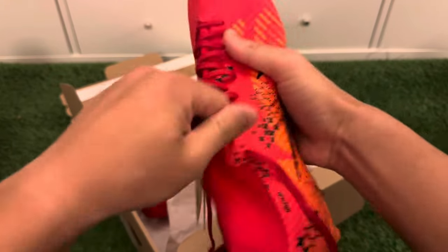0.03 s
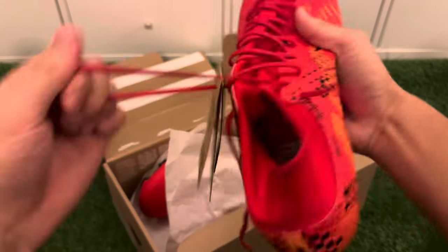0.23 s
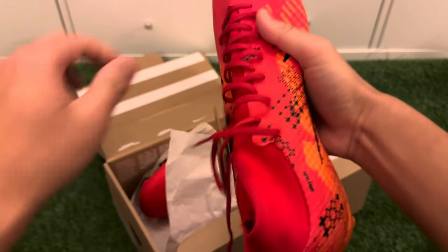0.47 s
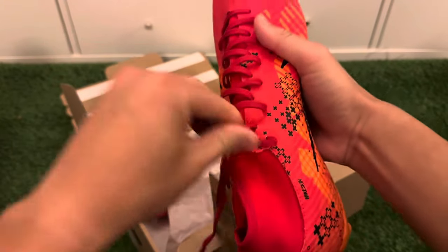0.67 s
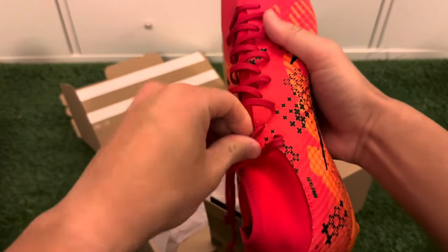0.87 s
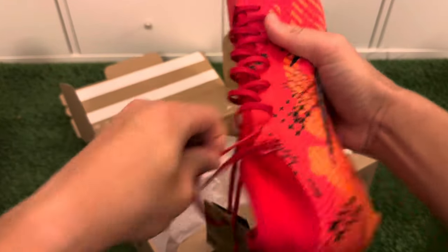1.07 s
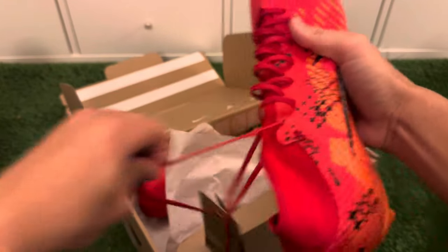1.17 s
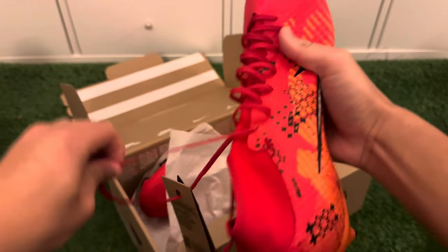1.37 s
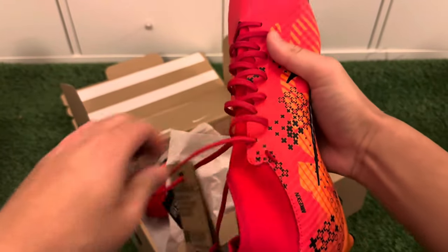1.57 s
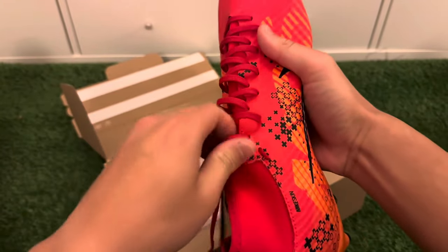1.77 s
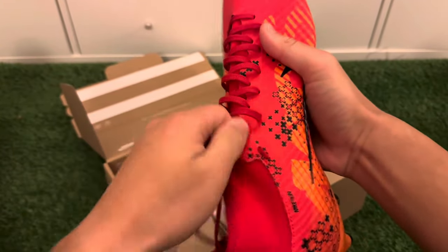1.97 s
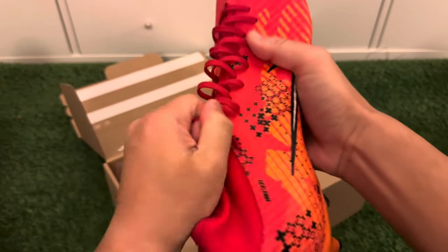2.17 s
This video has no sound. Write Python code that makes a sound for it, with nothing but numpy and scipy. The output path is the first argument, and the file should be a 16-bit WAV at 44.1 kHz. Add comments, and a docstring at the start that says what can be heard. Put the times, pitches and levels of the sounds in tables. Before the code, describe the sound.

Two fast whining lace pulls on a stiff boot, with hollow thumps, a crack and light taps

```python
"""A tap, then a quick whining rasp: fingers pull a lace through the eyelets of a synthetic boot.
A second pull follows; in each, the weave whines and ticks at a given rate, and a thump of the hollow boot
comes near the end. The second also brings a hard crack of the lace end.
Around the pulls, bursts of noise make taps, and ringing grains and noise make rubs and squeezes.
Short dull echoes and a quiet room hum lie below; two microphone ports, left and right, pick it all up."""
import sys
import numpy as np
from scipy import signal
from scipy.fft import rfft, irfft, next_fast_len
from scipy.io import wavfile
from scipy.ndimage import uniform_filter1d

SR = 44100
rng = np.random.default_rng(int(sys.argv[2]) if len(sys.argv) > 2 else 0)


def waveform_to_disk(signal):
    """Save audio, clipped to [-1, 1], as 16-bit WAV at the path in sys.argv[1]."""
    frames = np.transpose(np.atleast_2d(signal))
    scaled = np.clip(frames, -1, 1) * 32767
    samples = np.round(scaled).astype(np.int16)
    wavfile.write(sys.argv[1], SR, samples)


N = 97152

# Rustle of the upper over time, also steering lace and handling left or right:
# start_s [s], level_db [dB before a trim], left_over_right_db [dB]
RUSTLE_CURVE = [(0.0, -66, 6), (0.01, -63, -3), (0.02, -52, 1), (0.02, -41, -5), (0.04, -50, 4),
                (0.06, -52, 3), (0.11, -32.5, -1.5), (0.18, -32, -0.5), (0.2, -43, -1), (0.27, -55, 0.5),
                (0.28, -52, 6), (0.3, -65, -0.5), (0.37, -61, 2.0), (0.4, -65, -1), (0.45, -61, 1.5),
                (0.47, -55.5, 0), (0.61, -68, 4), (0.62, -49.5, 1), (0.7, -53.5, 0.5), (0.77, -65.5, 0.5),
                (0.8, -54.5, 3), (0.83, -58.5, -0.5), (1.0, -67.5, 1.5), (1.01, -45, 0), (1.11, -37, -1.5),
                (1.14, -35, 1), (1.14, -39, -10), (1.16, -43, 0), (1.17, -24, -4), (1.18, -63, 3),
                (1.21, -53, 2), (1.24, -58, 1), (1.26, -36, 0), (1.27, -52, 2), (1.29, -40, -1.0),
                (1.31, -50, 0), (1.44, -70, 2), (1.51, -67.5, 2.5), (1.61, -78.5, 1.5), (1.66, -61, 3),
                (1.7, -77, -3), (1.71, -45.5, 1.5), (1.73, -59, 2), (1.75, -41.5, -3), (1.76, -49.5, 0.5),
                (1.9, -60.5, 0.5), (1.92, -41.5, -4), (1.93, -47.5, 0), (2.02, -60.5, 1.5),
                (2.07, -57, 0.5), (2.09, -51.5, 2.5), (2.11, -61, 0.0), (2.16, -48.5, 0), (2.2, -57, 2)]


def lace(pull):
    """The braid passes the eyelet at an uneven rate: a whine at that rate, and ticks that ring the upper."""
    jitter_share, tick_spread_db, tick_db = 0.075, 4.0, -1
    rate, level_db = in_time(pull)
    inside = in_time([(pull[0][0], 1), (pull[-1][0], 1)], 0)[0]   # 1 during the pull, 0 outside
    level = inside * from_db(level_db)

    wobble = rms_one(uniform_filter1d(rng.standard_normal(N), size=60))
    turns = np.cumsum(rate * (1 + jitter_share * wobble)) / SR
    whine = np.sqrt(2) * np.sin(2 * np.pi * turns)

    # one tick per whole turn; rarer ticks are larger
    new_turn = np.diff(np.floor(turns), prepend=0) > 0
    ticks = new_turn * from_db(tick_spread_db * rng.standard_normal(N)) * SR / rate
    return level * whine + from_db(tick_db) * upper(level * ticks) / 2


def crack():
    """The lace end whips against the upper: one short hard crack, a little to the right."""
    start_s, peak_db, t60_s, band_hz = 1.1445, -17.0, 0.012, (600, 3500)
    t = np.arange(N) / SR - start_s
    fall = (t >= 0) * from_db(-60 * np.maximum(t, 0) / t60_s)
    burst = cut(rng.standard_normal(N) * fall, band_hz, "band")
    return from_db(peak_db) * burst / np.abs(burst).max() * from_db([[-1.7], [1.7]])


def taps():
    """Each tap is a dying burst: it rings low and high resonances of the upper, scuffs and snaps."""
    # Taps and snaps on the upper: start_s [s], low_db, high_db, scuff_db, snap_db [dB before trims],
    # left_over_right_db [dB], t60_s [s to fall 60 dB]
    tap_table = [(0.02, -31.5, -33, -42, -45, -0.5, 0.045), (0.075, -39, -50, -68, -71, -6, 0.019),
                 (0.387, -60, -68, -62, -46, 4, 0.021), (0.413, -49, -57.5, -54.5, -65, 6.5, 0.056),
                 (0.436, -45, -51.5, -53, -61, 5, 0.036), (0.454, -49, -54, -53.5, -43, 9, 0.052),
                 (0.623, -35, -41.5, -45.5, -53, -0.5, 0.037), (0.639, -47, -45.5, -48, -40, 8, 0.073),
                 (0.664, -41, -44.5, -60, -63, -2, 0.057), (0.689, -48, -48.5, -69, -68, -1, 0.09),
                 (0.744, -67, -64, -70, -52, 9, 0.03), (0.788, -53, -59, -67, -70, 0.5, 0.063),
                 (0.857, -54, -62, -67, -48, 3, 0.041), (0.943, -57.5, -60.5, -58, -67, 7, 0.054),
                 (1.013, -35, -61, -64, -58, -1, 0.017), (1.144, -25.5, -34, -38.5, -28.5, -1, 0.01),
                 (1.252, -30, -46, -56, -57, -1.0, 0.043), (1.281, -39.5, -53.5, -63, -64, 2, 0.055),
                 (1.5, -57, -65, -64, -49.5, 0.0, 0.048), (1.71, -45, -48.5, -61, -70, 10, 0.054),
                 (1.747, -51, -43.5, -60, -64, 3, 0.09), (1.797, -44, -47, -64, -64, 2, 0.058),
                 (1.85, -62, -61, -58.5, -50, 7, 0.05), (1.915, -34.5, -49, -50, -53, 9, 0.03),
                 (2.056, -52, -64.5, -68, -60, -1, 0.03), (2.084, -33, -76, -77, -68, -7.5, 0.09),
                 (2.131, -43, -57, -59, -64, -7, 0.021), (2.145, -45, -49, -73, -69, 3, 0.038)]
    low_trim_db, high_trim_db, snap_trim_db = -3, 4, 10
    snap_t60_share, first_contact = 0.7, 8
    out = np.zeros((2, N))
    t = np.arange(4096) / SR
    for start_s, low_db, high_db, scuff_db, snap_db, pan_db, t60_s in tap_table:
        noise = rng.standard_normal(len(t))
        noise[0] = first_contact   # an opening click, well above the noise
        fall_db = -60 * t / t60_s
        ring = upper(noise * from_db(fall_db))
        snap = noise * from_db(fall_db / snap_t60_share)   # dies sooner than the ring
        parts = [(low_db + low_trim_db, cut(ring, [686, 1190], "band")),
                 (high_db + high_trim_db, cut(ring, 1790, "high")),
                 (scuff_db + snap_trim_db, cut(snap, [3200, 6800], "band")),
                 (snap_db + snap_trim_db, cut(snap, 7500, "high"))]
        tap = sum(from_db(db) * x / np.abs(x).max() for db, x in parts)
        panned = tap * from_db([[pan_db / 2], [-pan_db / 2]])
        i = int(start_s * SR)
        out[:, i:i + len(t)] += panned[:, :N - i]
    return out


def thumps():
    """The boot's cavity rings a few cycles, sagging in pitch at first."""
    # Thumps of the hollow boot: start_s [s], level_db [dB before a trim], pitch_hz [Hz after the sag],
    # t60_s [s to fall 60 dB]
    thump_table = [(0.178, -25.5, 313, 0.036), (0.275, -34, 252, 0.019), (0.449, -32.5, 417, 0.016),
                   (0.642, -36, 281, 0.069), (1.013, -32.5, 286, 0.018), (1.167, -28.5, 266, 0.046),
                   (1.255, -38.5, 279, 0.063), (1.804, -40.5, 292.9, 0.074), (2.13, -41.5, 234, 0.045)]
    trim_db, rise_s = 3.5, 0.00083
    sag_share, sag_s = 0.25, 0.0018   # the pitch starts a quarter high
    out = np.zeros(N)
    for start_s, level_db, pitch_hz, t60_s in thump_table:
        t = np.maximum(np.arange(N) / SR - start_s, 0)
        turns = pitch_hz * (t + sag_share * sag_s * (1 - np.exp(-t / sag_s)))
        fall = from_db(level_db + trim_db - 60 * t / t60_s)
        rise = 1 - np.exp(-t / rise_s)
        out += np.sin(2 * np.pi * turns) * fall * rise
    return out


def handling():
    """Small random slips ring the hollow body and the upper; noise rumbles, fabric scuffs and hisses."""
    # Squeezing over time: start_s [s], rumble_db [dB], body_db [dB before a trim]
    squeeze_curve = [(0.0, -60, -66), (0.02, -72, -55), (0.05, -68, -58), (0.08, -59, -42),
                     (0.12, -71, -44), (0.19, -29.5, -44), (0.23, -54.5, -52), (0.27, -59.5, -58),
                     (0.29, -51.5, -44), (0.31, -59, -64), (0.34, -59, -50), (0.42, -69.5, -62.5),
                     (0.46, -52.5, -41.5), (0.49, -56.5, -75), (0.51, -60, -65), (0.6, -82, -74),
                     (0.65, -60.5, -42), (0.69, -57, -41.5), (0.71, -53, -46), (0.75, -64.5, -61),
                     (0.91, -73, -58.5), (0.94, -86, -63), (0.98, -72, -69), (1.02, -52.5, -43),
                     (1.1, -69, -40.5), (1.13, -62, -47), (1.18, -50, -32.5), (1.21, -57, -73.5),
                     (1.24, -60, -60), (1.26, -66, -39), (1.31, -53.5, -50), (1.38, -70, -66.5),
                     (1.66, -77, -76), (1.71, -72, -48.5), (1.78, -67, -50.5), (1.81, -49.5, -55),
                     (1.86, -60.5, -55.5), (1.93, -68, -58), (1.97, -62, -51.5), (2.0, -84, -66),
                     (2.06, -68, -56.5), (2.09, -54.5, -46.5), (2.15, -46.5, -45.5), (2.2, -64, -51.5)]
    # Rubbed fabric over time: start_s [s], scuff_db [dB], hiss_db [dB before a trim]
    fabric_curve = [(0.0, -61, -79), (0.01, -75, -82), (0.02, -64, -73), (0.05, -59.5, -89),
                    (0.08, -65.5, -62), (0.15, -50.5, -49), (0.18, -53.5, -53.5), (0.23, -66.5, -68.5),
                    (0.32, -79.5, -69.5), (0.39, -68, -60.5), (0.41, -70, -77), (0.46, -63, -53.5),
                    (0.46, -59.5, -70), (0.56, -73.5, -58), (0.64, -57.5, -58), (0.68, -64.5, -67.5),
                    (0.78, -75, -75), (0.79, -63, -57.5), (0.8, -69.5, -73), (0.84, -73.5, -71),
                    (1.0, -69, -73), (1.03, -60, -60.5), (1.13, -56, -57.5), (1.14, -50, -61),
                    (1.16, -59, -58), (1.21, -65, -80), (1.32, -60, -62.5), (1.33, -65.5, -76),
                    (1.45, -81, -87), (1.49, -76.5, -76.5), (1.62, -87.5, -84.5), (1.71, -71.5, -67.5),
                    (1.82, -63.5, -67), (1.9, -73.5, -70.5), (1.92, -52, -48), (1.92, -57, -64.5),
                    (1.98, -70, -72.5), (2.11, -79.5, -73.5), (2.13, -63, -58), (2.2, -73, -82)]
    # Resonances of the low rumble, then of the hollow boot: pitch_hz [Hz], width_hz [Hz], level_db [dB]
    rumble_modes = [(53.7, 43, -4.5), (111, 90, -0.5)]
    body_modes = [(216, 53, -2.5), (307, 38, 0), (410, 80, -8.5)]
    # Colour of the scuff, then of the fabric hiss: pitch_hz [Hz], level_db [relative dB]
    scuff_colour = [(2600, -10.5), (3300, -8.5), (4000, -2), (4500, -7), (5100, -3), (6500, -5),
                    (7500, -22.5)]
    hiss_colour = [(6000, -27.5), (7200, -3.5), (8500, -4.5), (10200, -7), (12500, -2.5), (14500, -11),
                   (15700, -8), (16300, -15.5)]
    body_trim_db, upper_trim_db, hiss_trim_db = -2.5, -6, 4.5
    rumble_db, body_db = in_time(squeeze_curve)
    upper_db, _ = in_time(RUSTLE_CURVE)
    scuff_db, hiss_db = in_time(fabric_curve)

    fibres = grains(15000, spread_db=4.5)
    rumble = rms_one(resonate(rng.standard_normal(N), rumble_modes))
    body = rms_one(resonate(grains(900, spread_db=3.5), body_modes))
    rustle = rms_one(upper(grains(4000, spread_db=0.5)))
    scuff = rms_one(coloured(fibres, scuff_colour))
    hiss = rms_one(coloured(fibres, hiss_colour))
    return (from_db(rumble_db) * rumble
            + from_db(body_db + body_trim_db) * body
            + from_db(upper_db + upper_trim_db) * rustle
            + from_db(scuff_db) * scuff
            + from_db(hiss_db + hiss_trim_db) * hiss)


def upper(x):
    """The stiff upper of the boot rings between two steep edges."""
    # Resonances of the upper: pitch_hz [Hz], width_hz [Hz], level_db [dB]
    upper_modes = [(519, 115, -1.5), (864, 154, -2.5), (968, 127, -1), (1304, 216, -9), (1530, 163, -5),
                   (2034, 227, -8), (2525, 520, -12.5)]
    return cut(resonate(x, upper_modes), (443, 2660), "band")


def walls(x):
    """A short dull reverberation: dying noise, different at each port, smears the sound."""
    t60_s, level_db = 0.18, -17.5
    t = np.arange(SR // 3) / SR
    tail = rng.standard_normal((2, len(t))) * from_db(-60 * t / t60_s)
    tail = tail * (t > .004)   # the first echoes arrive after 4 ms
    tail = signal.lfilter([.3], [1, -.7], tail)   # dulls the treble
    tail = tail / np.sqrt((tail ** 2).sum(1, keepdims=True))
    return from_db(level_db) * signal.fftconvolve(x, tail, axes=1)[:, :N]


def room_hum():
    """The quiet room is steady noise, coloured so that the low end stands out."""
    # Colour of the room: pitch_hz [Hz], level_db [relative dB]
    room_colour = [(18, -22), (30, 2), (100, 17), (540, -36), (988, -19), (1190, -78), (1540, -13.5),
                   (7270, -39.5), (8520, -40), (16000, -85)]
    first, second = [from_db(-75.5) * rms_one(coloured(rng.standard_normal(N), room_colour))
                     for _ in range(2)]
    return spread(first, second)


def spread(first, second):
    """Two unrelated versions of a sound mixed as the ports' likeness demands."""
    # How alike the two ports sound: pitch_hz [Hz], likeness [0 to 1]
    likeness = [(60, 0.98), (300, 1), (1000, 0.73), (3000, 0.37), (6000, 0.26), (9000, 0.97), (15000, 0.51)]

    def alike(hz):
        """Likeness of the ports at each frequency."""
        return np.clip(at_hz(likeness, hz), 0, 1)

    mid = filtered(first, lambda hz: np.sqrt((1 + alike(hz)) / 2))
    side = filtered(second, lambda hz: np.sqrt((1 - alike(hz)) / 2))
    return mid + side * [[1], [-1]]


def grains(rate, spread_db):
    """Random slips of uneven size and either sign, at a mean rate per second."""
    sizes = from_db(spread_db * np.minimum(rng.exponential(1, N), 4))
    signs = rng.choice([-1, 1], N)
    return sizes * signs * (rng.random(N) < rate / SR)


def resonate(x, modes):
    """Parallel resonances with alternating signs; a wider one dies sooner."""
    out = 0
    for k, (hz, width_hz, db) in enumerate(modes):
        r = np.exp(-np.pi * width_hz / SR)
        poles = [1, -2 * r * np.cos(2 * np.pi * hz / SR), r * r]
        ring = signal.lfilter([1 - r * r, 0, r * r - 1], poles, x + 1e-18)
        out = out + (-1) ** k * from_db(db) * ring
    return out


def cut(x, edge_hz, kind):
    """Steep filter that keeps a band or the treble."""
    return signal.sosfilt(signal.butter(3, edge_hz, kind, fs=SR, output="sos"), x)


def coloured(x, spectrum):
    """Shape a sound by a table of frequency and dB."""
    return filtered(x, lambda hz: from_db(at_hz(spectrum, hz)))


def filtered(x, response):
    """Apply a response given as a function of frequency."""
    size = next_fast_len(N + 4096)
    hz = np.arange(size // 2 + 1) * SR / size
    return irfft(rfft(x, size) * response(hz), size)[..., :N]


def at_hz(points, hz):
    """Read a frequency table on a log-frequency axis."""
    table_hz, values = np.array(points).T
    return np.interp(np.log(hz + 1), np.log(table_hz), values)


def in_time(rows, outside=None):
    """Columns of a curve table at every sample."""
    s, *columns = np.transpose(rows)
    return [np.interp(np.arange(N) / SR, s, c, outside, outside) for c in columns]


def from_db(db):
    """Decibels to gain."""
    return 10 ** (np.asarray(db) / 20)


def rms_one(x):
    """Scale to rms 1."""
    return x / np.sqrt(np.mean(x ** 2) + 1e-20)


def scene():
    """Boot, laces and room as they reach the two ports."""
    # The two lace pulls: start_s [s], weave_rate [ticks per s], level_db [dB]
    pull_one = [(0.075, 420, -50), (0.095, 530, -44), (0.112, 630, -39), (0.127, 770, -41),
                (0.14, 1050, -40), (0.152, 1230, -40), (0.165, 1350, -40), (0.173, 1180, -44),
                (0.188, 900, -41), (0.195, 880, -58)]
    pull_two = [(1.02, 275, -50), (1.036, 390, -43), (1.05, 570, -42), (1.062, 715, -43), (1.07, 480, -43),
                (1.085, 480, -38), (1.11, 550, -38), (1.128, 620, -41), (1.14, 640, -50), (1.165, 650, -48)]
    pan = from_db(in_time(RUSTLE_CURVE)[1] / 2 * [[1], [-1]])
    rubbed = spread(handling(), handling()) + lace(pull_one) + lace(pull_two)
    boot = rubbed * pan + taps() + crack() + thumps()
    return boot + walls(boot) + room_hum()


def record(dry):
    """The ports lose the deepest bass and differ in phase towards the treble; the top is cut."""
    # Phase by which the left port leads: pitch_hz [Hz], lead [radians]
    port_phase = [(100, 0.08), (600, .15), (2500, 0.8), (4500, 1), (6200, 1.6), (7700, 3.0), (10800, 2.46),
                  (12800, 1.32), (14700, .3), (16000, 0.5)]
    ports = filtered(dry, lambda hz: np.exp(.5j * at_hz(port_phase, hz) * [[1], [-1]]))
    ports = signal.sosfilt(signal.butter(2, 40, "high", fs=SR, output="sos"), ports)
    return signal.sosfilt(signal.cheby2(24, 75, 16350, fs=SR, output="sos"), ports)


dry = scene()
out = record(dry)
waveform_to_disk(out)
```